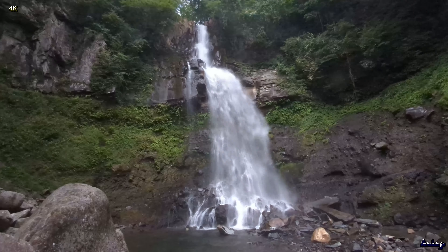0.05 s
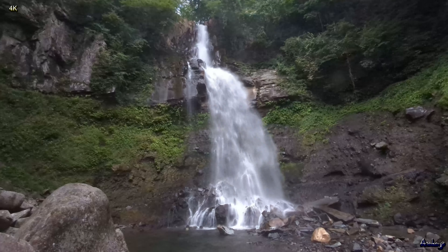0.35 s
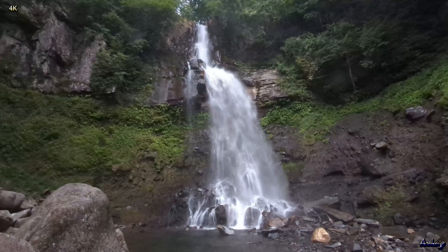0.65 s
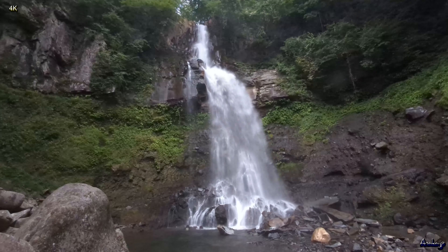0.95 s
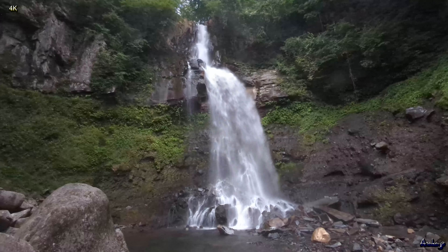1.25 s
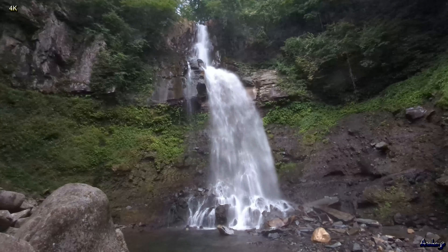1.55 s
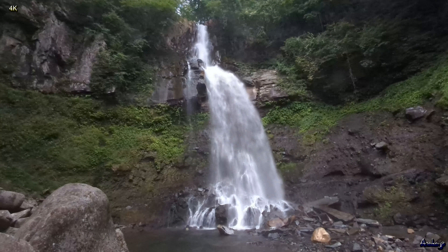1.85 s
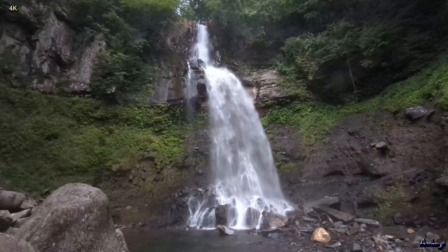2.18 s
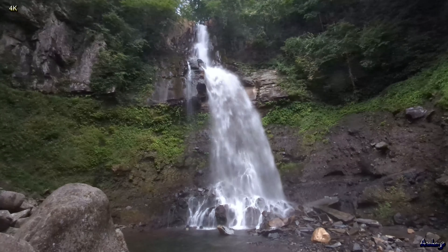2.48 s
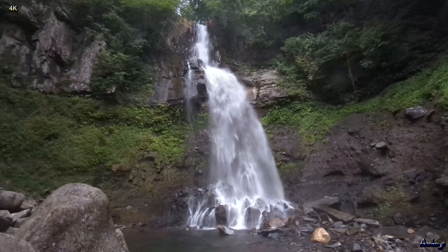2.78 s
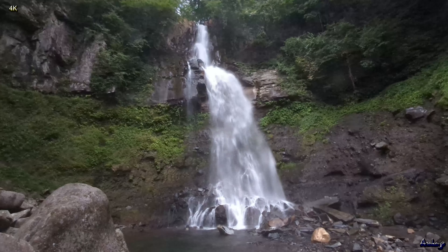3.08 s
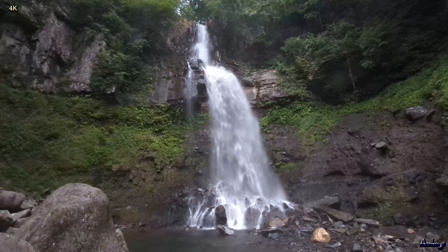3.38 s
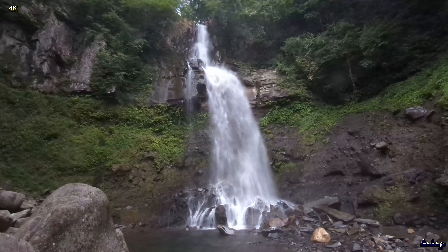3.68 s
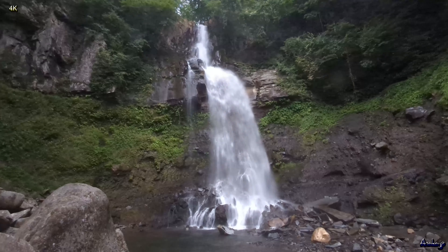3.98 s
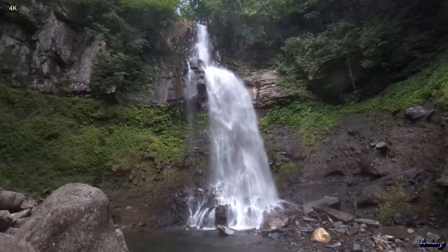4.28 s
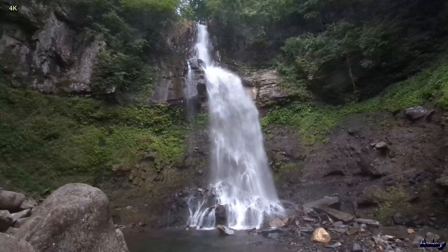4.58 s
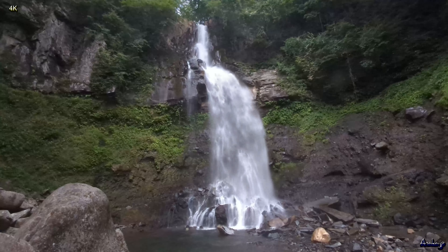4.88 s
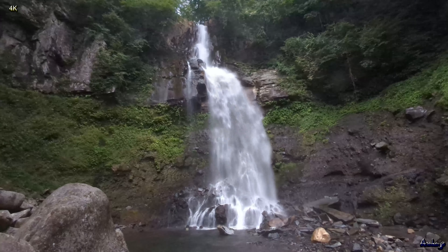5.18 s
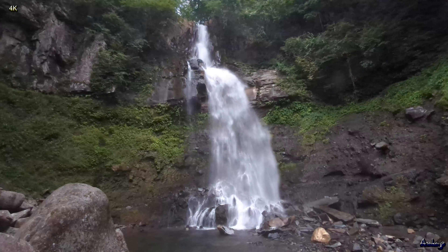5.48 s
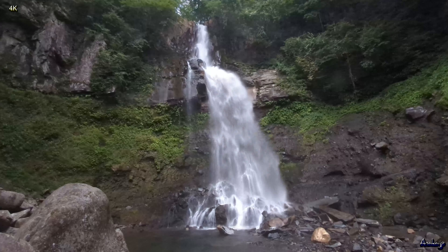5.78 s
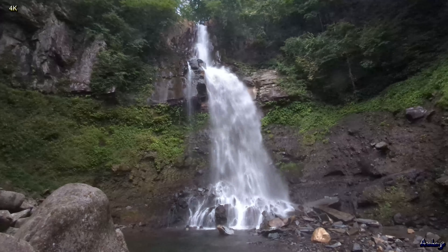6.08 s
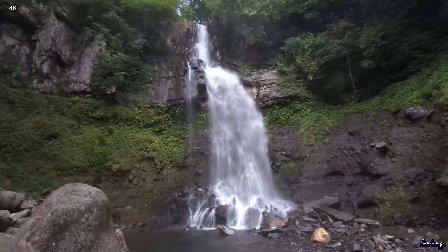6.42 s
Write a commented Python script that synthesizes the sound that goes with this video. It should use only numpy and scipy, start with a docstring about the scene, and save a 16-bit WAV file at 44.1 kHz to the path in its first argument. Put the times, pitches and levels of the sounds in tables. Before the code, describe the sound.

Steady rush of a waterfall splashing on rocks, with bright spray, faint deep churning and a few soft wind bumps.

```python
"""A tall waterfall in a gorge, heard from across the pool on a two-port stereo microphone.
From the start the plunge roars, sheets splash on boulders and spray hisses, surging as clumps of water land.
The draught of the fall buffets the ports in low puffs, often in the first second, then now and again.
Near 5 s the deep churning of the pool lulls and swells back; around 6 s the puffs crowd in once more."""
import sys
import numpy as np
from scipy import signal
from scipy.fft import rfft, irfft, next_fast_len
from scipy.io import wavfile
from scipy.ndimage import uniform_filter1d, map_coordinates

SR = 44100
rng = np.random.default_rng(int(sys.argv[2]) if len(sys.argv) > 2 else 0)


def output_pcm(signal):
    """Save a mono or channel-first signal as 16-bit PCM at the path in sys.argv[1].

    Samples are clipped to [-1, 1] before scaling.
    """
    pcm = np.clip(np.atleast_2d(signal).T, -1, 1) * 32767
    wavfile.write(sys.argv[1], SR, np.round(pcm).astype(np.int16))


N = 284445

# how much water is landing: t/s, level/dB about the usual flow
WATER_FLOW = [(0.1, -1.2), (1.3, 0), (1.85, 0), (2.0, 0), (2.6, -0.4), (3.1, 0.45), (3.78, -0.7),
              (4.55, 0.8), (5.6, 0.45), (6.42, 0.4)]
# colour of the fall from across the pool, roar then hiss: f/Hz, left level/dB, right level/dB
ROAR_SPECTRUM = [(200, -10.5, -10.5), (396, -13.5, -13.5), (490.0, -19.5, -13.4), (570, -13, -10),
                 (892, -9, -13.5), (954, -8, -3.5), (1210, -13, -13), (1465, -10.5, -12.5), (1583, -7, -8),
                 (1970, -10, -10), (2240, -6.5, -5.5), (3200, -5.5, -7), (3970, -2.9, -5), (4380, -6, -3)]
HISS_SPECTRUM = [(4460, -3.5, -8.5), (5040, -4, -5), (5300.0, -2.5, -3), (5570, -4.5, -5.5),
                 (6670, -0.8, -3), (7420, -5.5, -3.5), (8400.0, -2.5, -3), (9500, -8, -3.5),
                 (9720, -7, -8.5), (10820, -9.5, -0.5), (12100, -4.5, 0), (12500.0, -15, -1),
                 (13200.0, -8.5, -0.5), (15800, -14.5, -10.6)]
# the roar comes from ahead, the hiss from all round: f/Hz, left-right correlation
STEREO_CORRELATION = [(200, 1), (430, 0.62), (650, 0.75), (880, 0.02), (1400, -0.014), (1700, 0.35),
                      (2000, 0.08), (2400, 0.47), (3200, 0.17), (6000, 0.029), (12000, 0.028)]
# churning of the pool: t/s, level/dB about its usual level
POOL_CHURN = [(0.25, 0.5), (0.8, -3.5), (1.5, 0), (2.5, -2), (3.05, 1), (3.9, -1.5), (4.3, 0.5),
              (4.85, -5.5), (5.35, 3.5), (6.4, 0)]
# puffs of air on the ports: t/s, left level/dB, right level/dB, half length/s, centre f/Hz
AIR_PUFFS = [(0.019, -21, -27, 0.029, 88), (0.104, -29, -35, .022, 100), (.297, -56, -33.5, 0.023, 140),
             (0.561, -37, -37, 0.018, 110), (0.674, -33.5, -50, 0.019, 109),
             (0.834, -56, -34.5, 0.024, 150), (.98, -43, -38.5, .025, 100), (1.67, -48, -31.5, 0.019, 121),
             (2.797, -35, -45, 0.017, 100), (3.004, -45, -37, .026, 150), (4.094, -38, -37, .014, 220),
             (4.381, -53, -33, .02, 201), (5.977, -44, -28.5, .009, 170), (6.076, -27, -27, 0.0065, 179),
             (6.116, -39, -35, .014, 150), (6.192, -32, -48, .008, 190), (6.333, -33.5, -30, 0.025, 222)]
# colour of the turbulence at a port: f/Hz, level/dB
FLUTTER_SPECTRUM = [(20, -18), (35, -1), (55, 3.5), (90, 5), (140, -1.5), (250, -2), (400, -4.5),
                    (700, -17), (1500, -40), (4000, -80)]
# echoes off the surfaces nearest the microphone: delay/s, left gain, right gain
SURFACE_ECHOES = [(.00077, .04, .03), (.0013, .06, .01), (.0035, 0.022, 0.041), (.0047, 0.011, .04)]

# layer levels at the usual flow, and dB gained per dB of flow: more water throws up more spray
PLUNGE_DB, SPLASH_DB, SPRAY_DB = -37.2, -26.5, -26
PLUNGE_GROWS, SPLASH_GROWS, SPRAY_GROWS = 0.64, 0.86, 1.5
RUMBLE_DB, FLUTTER_DB = -47.5, -47.5  # at the usual churning


def waterfall():
    """Across the pool, one flow of water plunges in, bursts on the boulders and breaks into spray."""
    flow_db = over_time(WATER_FLOW)
    clumps = patchy_noise(patchy_db=0.84, bins=3, frames=20)
    plunge = water_band(clumps, lo_hz=412, hi_hz=2196)
    sheets = patchy_noise(patchy_db=1.34, bins=4, frames=13)
    drops = amp(-11.5) * droplets(per_second=700, spread_db=3.5)
    splash = water_band(sheets + drops, lo_hz=2130, hi_hz=9130)
    mist = patchy_noise(patchy_db=1.84, bins=3, frames=14)
    fine_drops = amp(-12) * droplets(per_second=2800, spread_db=1.5)
    spray = water_band(mist + fine_drops, lo_hz=9150, hi_hz=19000)
    burst = wobble(17)  # each side of the landing zone surges, throwing up spray with it
    return (amp(PLUNGE_DB + PLUNGE_GROWS * flow_db + 0.3 * wobble(7.7)) * plunge
            + amp(SPLASH_DB + SPLASH_GROWS * flow_db + 0.49 * burst) * splash
            + amp(SPRAY_DB + SPRAY_GROWS * flow_db + 0.2 * burst) * spray)


def patchy_noise(patchy_db, bins, frames):
    """Water landing unevenly: stereo white noise with patches of random gain in frequency and time."""
    spectra = signal.stft(rng.standard_normal((2, N)), nperseg=512)[2]
    patches = uniform_filter1d(rng.standard_normal(spectra.shape), bins, axis=1)
    patches = unit(uniform_filter1d(patches, frames, axis=2))
    noise = signal.istft(spectra * amp(patchy_db * patches), nperseg=512)[1]
    return unit(noise[:, :N])


def droplets(per_second, spread_db):
    """Tiny impacts of uneven size, falling independently left and right."""
    hits = rng.random((2, N)) < per_second / SR
    signs = rng.choice([-1, 1], (2, N))
    return unit(hits * signs * amp(spread_db * rng.standard_normal((2, N))))


def water_band(source, lo_hz, hi_hz):
    """One band of the fall, spread and coloured as it reaches the microphone, at rms 1."""
    angle = lambda hz: np.arccos(over_frequency(STEREO_CORRELATION, hz)[0]) / 2
    mid, side = filtered(source, lambda hz: np.array([np.cos(angle(hz)), np.sin(angle(hz))]))
    below = lambda hz, edge_hz: 1 / (1 + (hz / edge_hz) ** 8)
    band = lambda hz: np.sqrt(below(hz, hi_hz) * (1 - below(hz, lo_hz)))
    colour = lambda hz: amp(over_frequency(list(ROAR_SPECTRUM) + list(HISS_SPECTRUM), hz))
    return unit(filtered(np.array([mid + side, mid - side]), lambda hz: band(hz) * colour(hz)))


def pool_rumble():
    """The pool churns deeply, almost straight ahead."""
    level_db = RUMBLE_DB + over_time(POOL_CHURN) + 1.4 * wobble(11)[0]
    churning = patchy_noise(patchy_db=2.5, bins=2, frames=12)
    return amp(level_db) * water_band(churning, lo_hz=115, hi_hz=385)


def draught():
    """Air flutters right on the ports, stirred by the churning pool, and puffs as eddies pass."""
    noise = rng.standard_normal((2, N))
    turbulence = unit(filtered(noise, lambda hz: amp(over_frequency(FLUTTER_SPECTRUM, hz))))
    air = amp(FLUTTER_DB + 0.28 * over_time(POOL_CHURN) + 2.4 * wobble(16)) * turbulence
    for peak_s, left_db, right_db, half_length_s, centre_hz in AIR_PUFFS:
        peak = int(peak_s * SR)
        span = np.arange(max(0, peak - SR // 5), min(N, peak + SR // 5))
        swell = np.exp(-.5 * ((span / SR - peak_s) / half_length_s) ** 2)
        air[:, span] += amp([[left_db], [right_db]]) * swell * eddy(centre_hz)[:, :len(span)]
    return air


def eddy(centre_hz):
    """Half a second of turbulence at both ports; a faster eddy has a higher centre."""
    ratio = np.fft.rfftfreq(SR // 2, 1 / SR) / centre_hz
    hump = ratio ** 2 / (1 + ratio ** 3.83)
    return unit(irfft(rfft(rng.standard_normal((2, SR // 2))) * hump))


def near_echoes(hz):
    """Response of the direct sound plus faint reflections from close by the microphone."""
    return 1 + sum(np.array([[left], [right]]) * np.exp(-2j * np.pi * hz * delay_s)
                   for delay_s, left, right in SURFACE_ECHOES)


def amp(db):
    """Decibels to gain."""
    return 10 ** (np.asarray(db) / 20)


def unit(x):
    """x scaled to rms 1."""
    return x / np.sqrt(np.mean(x ** 2) + 1e-20)


def over_frequency(rows, hz):
    """Each column after f/Hz, read at hz on a log axis."""
    row_hz, *columns = np.transpose(sorted(map(tuple, rows)))
    return np.array([np.interp(np.log(hz + 1), np.log(row_hz + 1), column) for column in columns])


def over_time(rows):
    """Rows of t/s, level/dB, read at every sample."""
    return np.interp(np.arange(N) / SR, *np.transpose(rows))


def wobble(knots_per_second):
    """A smooth random curve for each channel."""
    at = np.arange(N) * knots_per_second / SR
    return np.array([map_coordinates(rng.standard_normal(int(at[-1]) + 4), [at]) for _ in range(2)])


def filtered(x, response):
    """x through a frequency response."""
    size = next_fast_len(N + 8192)
    return irfft(rfft(x, size) * response(np.fft.rfftfreq(size, 1 / SR)), size)[..., :N]


def bell(hz, centre_hz, width_hz, db):
    """Gain of a narrow peak or notch."""
    return amp(db * np.exp(-.5 * ((hz - centre_hz) / width_hz) ** 2))


def scene():
    """Fall and pool from across the water, with their nearest echoes and the draught on the ports."""
    lag_s = np.array([[.000025], [0]])  # left hears it later: the fall stands slightly to the right
    water = waterfall() + pool_rumble()
    return filtered(water, lambda hz: near_echoes(hz) * np.exp(-2j * np.pi * hz * lag_s)) + draught()


def record(dry):
    """The microphone cuts the deepest bass and top treble, and has a narrow notch just above a peak."""
    low_cut_hz, top_hz = 45, 15780
    band = lambda hz: hz ** 3 / np.sqrt(hz ** 6 + low_cut_hz ** 6) * (hz < top_hz)
    notch = lambda hz: bell(hz, centre_hz=4083, width_hz=35, db=-15)
    peak = lambda hz: bell(hz, centre_hz=3996, width_hz=37, db=3.5)
    return filtered(dry, lambda hz: band(hz) * notch(hz) * peak(hz))


dry = scene()
out = record(dry)
output_pcm(out)
```